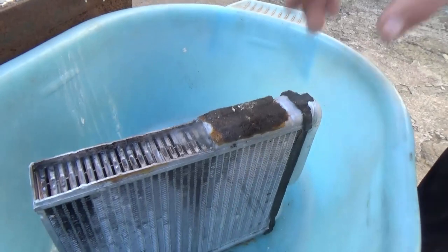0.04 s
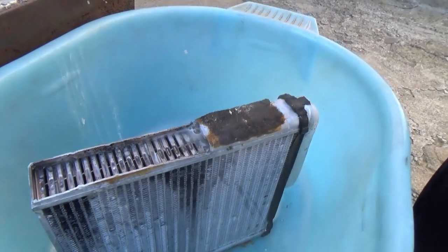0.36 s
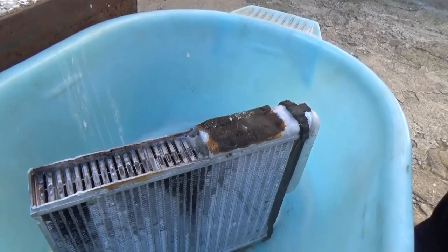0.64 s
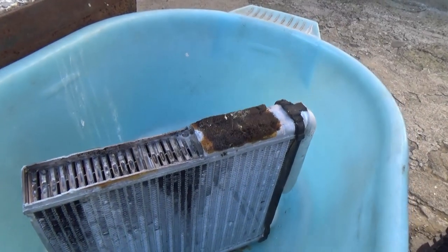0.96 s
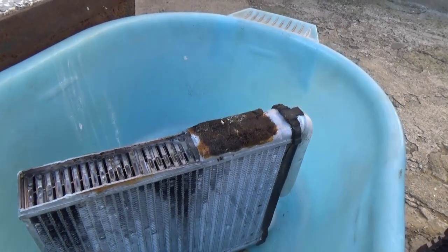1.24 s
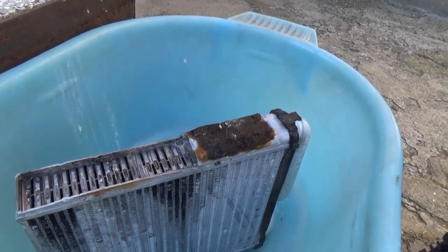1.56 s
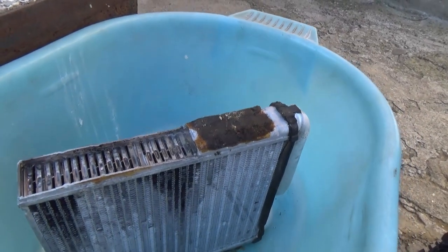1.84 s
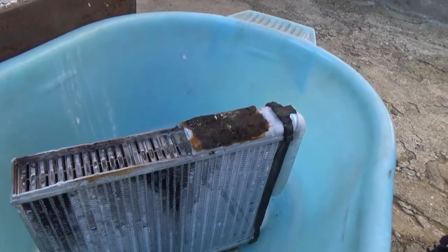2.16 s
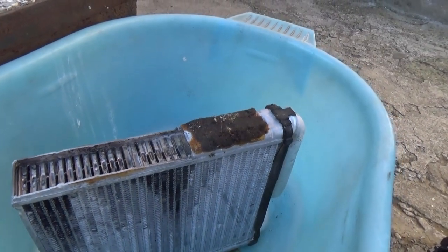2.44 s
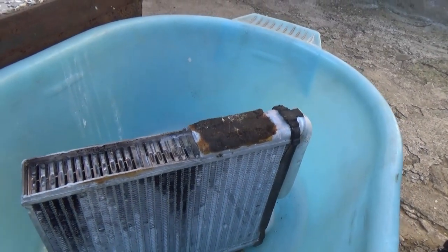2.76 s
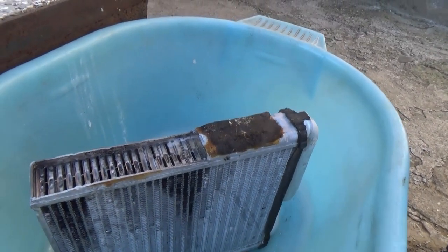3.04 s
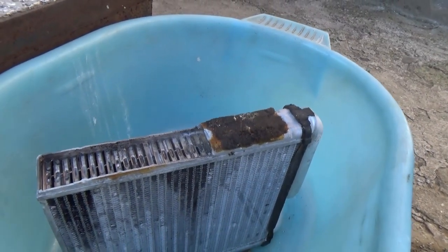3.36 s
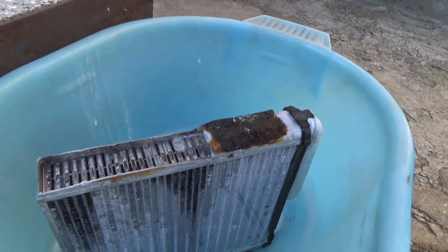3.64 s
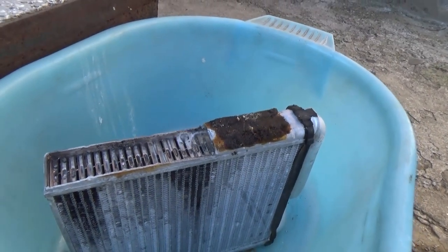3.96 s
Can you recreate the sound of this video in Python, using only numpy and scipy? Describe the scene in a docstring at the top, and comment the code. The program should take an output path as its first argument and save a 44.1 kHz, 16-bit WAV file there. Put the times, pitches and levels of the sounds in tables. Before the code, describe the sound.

Liquid fizzes faintly in a small metal radiator outdoors, a fine, bright hiss that grows slightly from about 3 seconds. Tiny sharp ticks appear, mostly in the first 1.7 seconds. Short bubble pops come irregularly throughout, ringing briefly in the metal and the plastic tub around it. A light breeze rumbles on the microphone, with soft thumps near 0.3, 0.9, 2.4, 3 and 3.5 seconds.

```python
"""Liquid fizzes inside a small metal radiator that stands in a plastic tub outdoors.
Countless tiny bubbles merge into a fine hiss, and snapping films add bright ticks. Larger bubbles burst
at the tube mouths with short pops that ring briefly in the radiator and echo off the tub.
A light breeze rumbles and thumps on the microphone over a faint bed of open air."""
import sys
import numpy as np
from scipy import signal
from scipy.fft import rfft, irfft
from scipy.io import wavfile
from scipy.ndimage import uniform_filter1d

SR = 44100
rng = np.random.default_rng(int(sys.argv[2]) if len(sys.argv) > 2 else 0)


def dump(signal):
    """Clip the signal to [-1, 1] and save it as 16-bit WAV at the path in sys.argv[1]."""
    limited = np.clip(np.atleast_2d(signal).T, -1, 1)
    pcm = np.round(limited * 32767).astype(np.int16)
    wavfile.write(sys.argv[1], SR, pcm)


N = 176400
TIME = np.arange(N) / SR

# tone colour of the hiss and the ticks: (frequency [Hz], relative level [dB])
FIZZ_COLOUR = [(1500, -29), (3000, -8), (4000, -8), (5300, -5), (6200, -6.5), (7100, -8), (8400, -1.5),
               (10300, 0.5), (11600, -0.5), (13200, -7), (15700, -11)]
FIZZ_PAN_DB = 1.0


def from_db(db):
    """Decibels to gain."""
    return 10 ** (np.asarray(db) / 20)


def unit_power(x):
    """Scale to an RMS of 1."""
    return x / np.sqrt(np.mean(x ** 2) + 1e-20)


def automation(rows):
    """One curve per column, joining timed breakpoints with straight lines."""
    times, *columns = np.transpose(rows)
    return [np.interp(TIME, times, column) for column in columns]


def equalise(x, spectrum):
    """Filter by a curve of (frequency [Hz], gain [dB])."""
    hz, db = np.transpose(spectrum)
    bins = np.maximum(np.fft.rfftfreq(N, 1 / SR), 1)
    return irfft(rfft(x) * from_db(np.interp(np.log(bins), np.log(hz), db)), N)


def noise(spectrum):
    """Coloured noise at unit power."""
    return unit_power(equalise(rng.standard_normal(N), spectrum))


def drift(rate_hz):
    """Random modulation at unit power, mostly slower than the given rate."""
    lowpass = 1 / (1 + (np.fft.rfftfreq(N, 1 / SR) / rate_hz) ** 2)
    return unit_power(irfft(rfft(rng.standard_normal(N)) * lowpass, N))


def stereo(mid, side=0, pan_db=0):
    """Left and right from mid and side; a positive pan leans left."""
    sign = np.array([[1], [-1]])
    return (mid + sign * side) * from_db(sign * pan_db / 2)


def resonance(x, hz, width_hz):
    """Two-pole band-pass with unity gain at its peak."""
    r = np.exp(-np.pi * width_hz / SR)
    feedback = [1, -2 * r * np.cos(2 * np.pi * hz / SR), r * r]
    return signal.lfilter(np.array([1, 0, -1]) * (1 - r * r) / 2, feedback, x + 1e-18)


def open_air():
    """Distant outdoor ambience: a dark, steady bed that widens towards the top."""
    # tone of the bed: (frequency [Hz], relative level [dB])
    colour = [(20, -38), (80, 4.5), (160, 1), (300, 0.5), (500, 1), (800, -1), (1120, -5), (1500, -12),
              (2500, -12), (4000, -24), (8000, -19.5), (15000, -47)]
    # stereo width: (frequency [Hz], side against mid [dB])
    width = [(100, -41), (250, -16), (550, -7), (1500, -3)]
    return from_db(-62) * stereo(noise(colour), equalise(noise(colour), width))


def eddies(spectrum):
    """Turbulence of even strength at the microphone's two ports; smaller eddies are less alike."""
    # stereo width of the wind: (frequency [Hz], side against mid [dB])
    width = [(30, -19), (70, -13.5), (130, -8), (240, -6.5), (400, 2.5)]
    mid = noise(spectrum)
    envelope = np.sqrt(uniform_filter1d(mid ** 2, size=1500) + 1e-9)
    return stereo(mid / envelope, equalise(noise(spectrum), width))


def breeze():
    """Gusts rumble on the microphone; now and then a higher flutter joins in."""
    # gusts in the low rumble: (time [s], relative level [dB])
    rumble_gusts = [(0.0, -46), (0.02, -48.5), (0.05, -40.5), (0.08, -58), (0.11, -45), (0.17, -47.5),
                    (0.21, -56.5), (0.32, -49.5), (0.37, -69), (0.44, -62), (0.47, -51), (0.51, -60.5),
                    (0.57, -54), (0.74, -72), (0.85, -73), (0.92, -57), (0.98, -51.5), (1.04, -55),
                    (1.06, -48), (1.21, -52), (1.25, -59.5), (1.36, -49), (1.55, -58.5), (1.59, -49),
                    (1.68, -47.5), (1.73, -61), (1.78, -51), (1.82, -67), (2.06, -58), (2.12, -51),
                    (2.26, -52), (2.33, -58), (2.38, -45), (2.42, -49.5), (2.45, -69), (2.51, -48.5),
                    (2.56, -46.5), (2.68, -60.5), (2.84, -49.5), (2.88, -63), (2.94, -45), (3.0, -48.5),
                    (3.04, -44), (3.15, -50), (3.23, -57), (3.36, -66), (3.4, -45.5), (3.53, -49),
                    (3.6, -44), (3.72, -68), (3.89, -51.5), (4.0, -54.5)]
    # gusts in the flutter: (time [s], relative level [dB])
    flutter_gusts = [(0.0, -47), (0.08, -70.5), (0.82, -71.5), (1.05, -60.5), (1.07, -50), (1.21, -57),
                     (1.24, -68), (1.63, -70), (1.66, -56), (1.73, -69), (2.48, -73), (2.56, -56),
                     (2.63, -72.5), (2.92, -62), (2.97, -53), (3.02, -60), (3.05, -41), (3.1, -63),
                     (3.17, -60), (3.26, -83), (3.41, -58), (3.48, -47.5), (3.63, -71), (4.0, -67)]
    # bass weight of the rumble: (frequency [Hz], relative level [dB])
    rumble_colour = [(15, -6), (28, -6.5), (50, 3), (80, 5.5), (130, 0.5), (170, -5.5), (230, -22.5),
                     (400, -47)]
    # low-mid body of the flutter: (frequency [Hz], relative level [dB])
    flutter_colour = [(100, -6), (170, 3), (230, 5), (320, -8), (500, -17.5), (1000, -40), (2000, -81)]
    rumble = from_db(automation(rumble_gusts)[0] + 0.5) * eddies(rumble_colour)
    flutter = from_db(automation(flutter_gusts)[0] + 1) * eddies(flutter_colour)
    return rumble + flutter


def buffets():
    """Single eddies thump on the microphone: rounded swings of pressure, a couple of cycles long."""
    # wind thumps: (time [s], envelope peak [dB], pitch [Hz])
    thumps = [(.311, -38, 84), (0.941, -37.5, 139), (2.103, -43.5, 70), (2.361, -37.5, 85.5),
              (2.977, -36.5, 148), (3.183, -41.5, 92), (3.475, -33, 195)]
    fade_cycles, side_db = 0.83, -10.5   # the fade runs from the peak down to about a third
    swings = 0
    for at, db, hz in thumps:
        cycles = hz * (TIME - at)
        envelope = from_db(db) * np.exp(-np.minimum((cycles / fade_cycles) ** 2, 20))
        swings = swings + envelope * np.exp(2j * np.pi * cycles)
    return stereo(-swings.imag, from_db(side_db) * swings.real)


def tub(x):
    """The plastic tub adds close echoes and a very short, diffuse tail."""
    # reflections off the walls: (delay [s], gain [dB])
    walls = [(.0032, -10.5), (.0057, -22)]
    tail_t60_s, tail_db, left_lag_s = 0.036, -3.5, 0.000045
    echoes = sum(from_db(db) * np.interp(TIME - delay, TIME, x, left=0) for delay, db in walls)
    t = TIME[:SR // 10]
    tails = rng.standard_normal((2, len(t))) * from_db(-60 * t / tail_t60_s)
    tails /= np.linalg.norm(tails, axis=1, keepdims=True)
    wet = signal.fftconvolve(x[None], tails, axes=1)[:, :N]
    left, right = stereo(x + echoes, pan_db=2.2)   # the sound reaches the two ports slightly unequally
    left = np.interp(TIME - left_lag_s, TIME, left)
    return np.array([left, right]) + from_db(tail_db) * wet


def cavities(x):
    """The radiator's cavities ring on after each pop."""
    # cavity resonances: (frequency [Hz], bandwidth [Hz], gain [dB])
    modes = [(1168, 86, 9), (1585, 65, 1.5), (2390, 170, 2.5), (2706, 49, 3), (3200, 82, 2.5),
             (5280, 990, -3)]
    return sum(from_db(db) * resonance(x, hz, width) for hz, width, db in modes)


def grain_gains(spread_db, count):
    """Random strengths of bursting bubbles: many small, few large."""
    return from_db(spread_db * np.minimum(rng.exponential(1, count), 4.5))


def bursts(rows):
    """Each (time [s], level [dB], pitch [Hz], length [cycles]) is a blip that swells fast and dies."""
    softness = 1.32   # higher rounds off the attack
    track, t = np.zeros(N + SR), TIME[:SR // 100]
    for at, db, hz, cycles in rows:
        age = hz * t / cycles * np.log(1e4) / softness   # 1 at the envelope's peak
        envelope = (age * np.exp(1 - age)) ** softness
        start = int(max(at, 0) * SR)
        track[start:start + len(t)] -= from_db(db) * envelope * np.sin(2 * np.pi * hz * t)
    return track[:N]


def ticks():
    """A tiny film snaps on the surface and sets off a flurry of six neighbours."""
    # film snaps: (time [s], relative level [dB])
    snaps = [(0.0553, -27), (.1652, -35), (.2605, -41), (.439, -34), (0.7415, -34), (1.2832, -28.5),
             (1.3286, -32), (1.631, -32), (2.002, -44), (3.094, -31)]
    pitch_hz, cycles, snap_db = 9900, 2.7, 3.5
    flurry_s, flurry_db, spread_octaves = 0.0056, -12.5, 0.41
    rows = []
    for at, db in snaps:
        rows.append((at, db + snap_db, pitch_hz, cycles))
        delays = flurry_s * rng.random(6)
        pitches = pitch_hz * 2 ** (spread_octaves * rng.standard_normal(6))
        rows += [(at + delay, db + flurry_db, hz, cycles) for delay, hz in zip(delays, pitches)]
    return stereo(equalise(bursts(rows), FIZZ_COLOUR), pan_db=FIZZ_PAN_DB)


def simmer():
    """Faint pops at random moments, ending louder and deeper as the reaction builds."""
    # course of the simmer: (time [s], level [dB], typical pitch [Hz])
    course = [(0, -76, 1950), (1.0, -75, 1950), (1.6, -67.5, 2250), (1.9, -69.5, 2150), (2.4, -74, 2000),
              (2.8, -68.5, 1790), (3.2, -71, 1610), (4, -69.5, 1620)]
    pops_per_s, spread_octaves, cycles = 300, 0.35, 5.1
    level_db, typical_hz = automation(course)
    count = int(pops_per_s * N / SR)
    starts = rng.integers(0, N, count)
    db = 20 * np.log10(grain_gains(spread_db=2.4, count=count))
    hz = typical_hz[starts] * 2 ** (spread_octaves * rng.standard_normal(count))
    rows = zip(starts / SR, db, hz, np.full(count, cycles))
    return from_db(level_db) * unit_power(bursts(rows))


def bubbling():
    """Larger bubbles pop over the simmer; both ring in the radiator and echo in the tub."""
    # larger bubbles: (time [s], relative level [dB], pitch [Hz], length [cycles])
    bubbles = [(0.0555,-32.5,4220,3.2), (0.0557,-47,2580,19), (0.1007,-45.5,2800,5.6), (0.251,-42,2600,1.3),
               (0.297,-49.5,2780,6.7), (.7146,-44.5,2030,3.3), (.737,-46,3700,4.6), (.746,-43,5130,6.5),
               (0.7598,-40.5,1700,2.7), (0.7616,-44,1640,5.4), (0.7637,-58,1220,5.2), (0.767,-46,2660,8),
               (.7807,-42,2640,3.1), (0.9562,-43.5,1350,2), (0.9738,-42.5,3000,4.7), (1.0162,-46,2580,8.9),
               (1.072,-39,2420,1.1), (1.093,-51,2350,6), (1.1266,-36.5,3440,2.5), (1.189,-43.5,2000,3.1),
               (1.2786,-43.5,2270,2.5), (1.3923,-42,1940,3.1), (1.4688,-39.5,2180,1.6),
               (1.471,-42,2960,3.7), (1.523,-48,2650,4.1), (1.5377,-44,2230,3.9), (1.555,-47.5,1850,5),
               (1.6566,-49,2230,3.5), (1.7385,-36.5,4290,1.4), (1.8174,-48.5,1800,5.4), (2.0537,-44,1480,2),
               (2.0686,-46,2350,6.1), (2.1388,-39,2250,1.3), (2.1457,-49,2760,3), (2.1994,-44,2280,6),
               (2.2383,-42.5,2080,5.4), (2.2465,-46.5,2360,5.5), (2.2558,-42.5,3550,4.6),
               (2.2655,-41,1880,4.1), (2.358,-38,5100,5.3), (2.38,-38,3700,3.8), (2.391,-41.5,2740,2.4),
               (2.4173,-43.5,1890,2), (2.4708,-35.5,4200,2.8), (2.636,-52,2150,7.6), (2.746,-46,1310,3.1),
               (2.8282,-56,1700,6), (2.9228,-37,3070,1.8), (2.955,-46,3080,2.7), (2.976,-40.5,2830,1.6),
               (3.0273,-44,2510,2.3), (3.0458,-45,1260,2.7), (3.0636,-35,3230,1.3), (3.1995,-51,1390,3.5),
               (3.2364,-53,1240,6.4), (3.292,-50,1260,4.6), (3.358,-42,1660,3), (3.366,-49,1650,4.2),
               (3.5722,-44,3070,5.6), (3.605,-43,2450,1.9), (3.78,-50.5,1440,5), (3.917,-47.5,1410,3.2),
               (3.965,-46.5,1570,6.5)]
    lead_s, trim_db = 0.00032, -1.56   # a pop starts just before its peak
    pops = bursts([(at - lead_s, db + trim_db, hz, cycles) for at, db, hz, cycles in bubbles])
    faint = simmer()
    ring = cavities(pops + from_db(-5.5) * faint)   # near the surface, the simmer stirs them less
    return tub(pops + faint + ring)


def fizz():
    """Thousands of microscopic bursts a second merge into a bright, grainy hiss."""
    # vigour of the fizz: (time [s], relative level [dB])
    vigour = [(0, -56), (.3, -58), (.8, -58), (1.1, -58.5), (1.4, -56), (2.15, -57.5), (2.5, -56),
              (2.8, -55.5), (3.2, -54), (3.45, -55), (4, -54.5)]
    # stereo width: (frequency [Hz], side against mid [dB])
    width = [(2500, -29), (4200, -32), (5500, -38), (6800, -9.5), (8500, -16), (11000, -16.5), (14500, -28)]
    bursts_per_s, flicker_db, trim_db = 14000, 0.56, 1
    triggers = rng.random(N) < bursts_per_s / SR
    clicks = triggers * grain_gains(spread_db=3, count=N) * rng.choice([-1, 1], N)
    level = from_db(automation(vigour)[0] + trim_db + flicker_db * drift(rate_hz=37))
    mid = unit_power(equalise(clicks, FIZZ_COLOUR))
    side = equalise(noise(FIZZ_COLOUR), width)
    return level * stereo(mid, side, pan_db=FIZZ_PAN_DB)


def scene():
    """Open air and breeze around the fizzing radiator."""
    return open_air() + bubbling() + ticks() + fizz() + breeze() + buffets()


def record(dry):
    """A steep low-pass takes off the very top."""
    cutoff_hz = 15850
    return signal.sosfilt(signal.ellip(16, .1, 90, cutoff_hz, fs=SR, output="sos"), dry)


dry = scene()
out = record(dry)
dump(out)
```